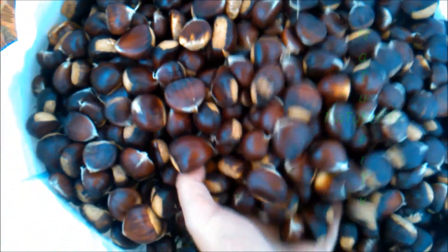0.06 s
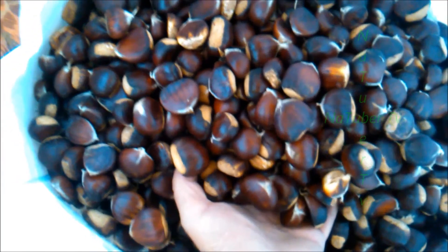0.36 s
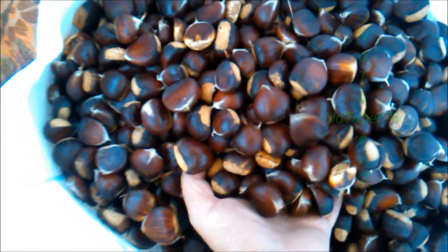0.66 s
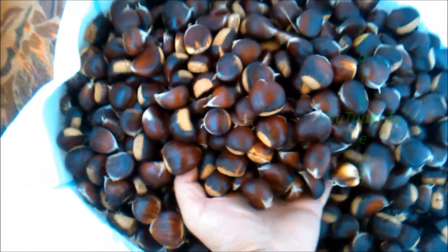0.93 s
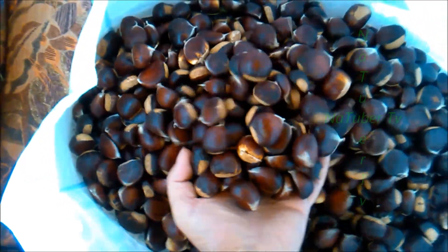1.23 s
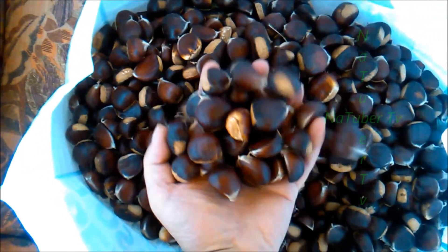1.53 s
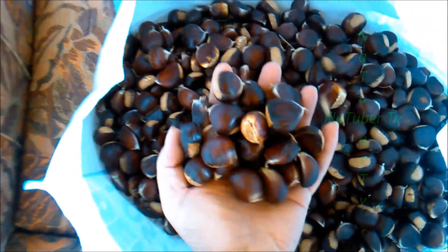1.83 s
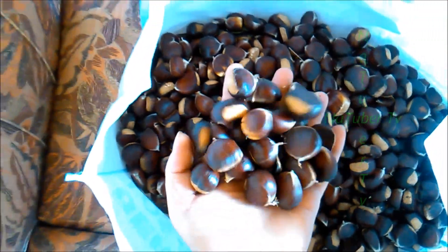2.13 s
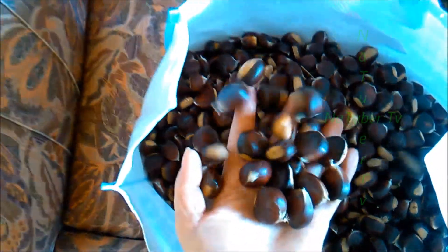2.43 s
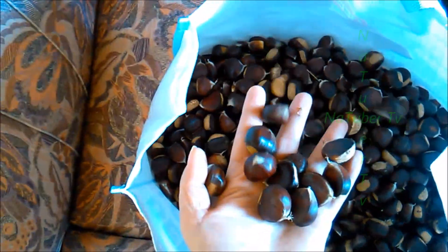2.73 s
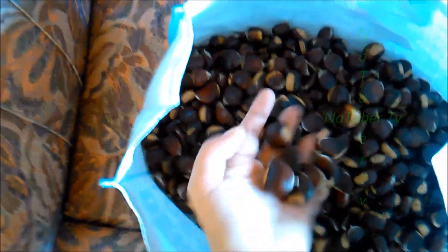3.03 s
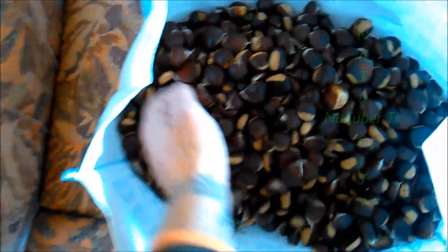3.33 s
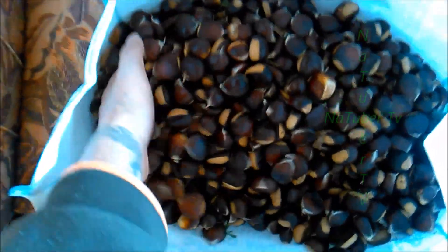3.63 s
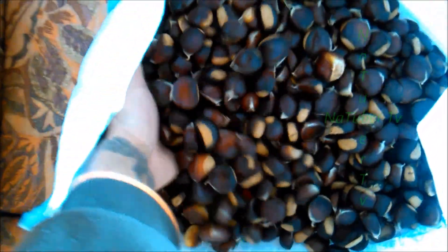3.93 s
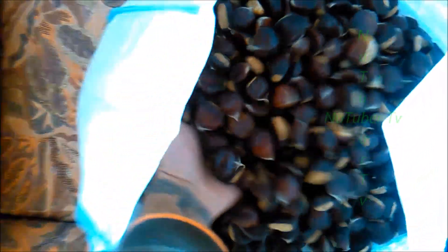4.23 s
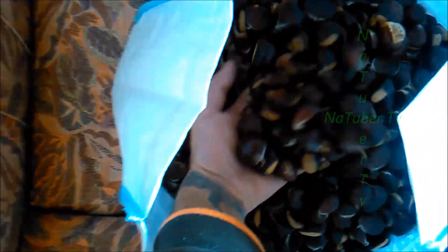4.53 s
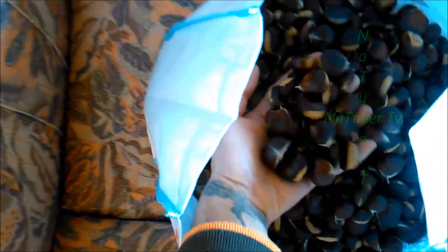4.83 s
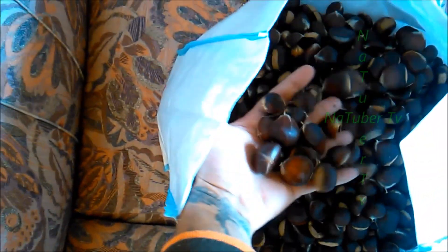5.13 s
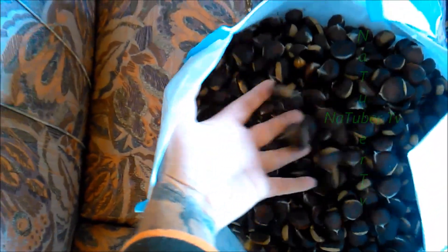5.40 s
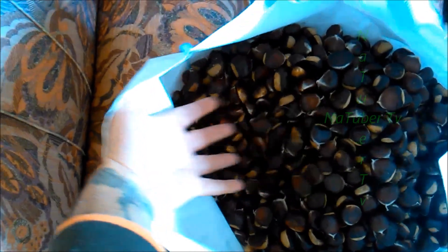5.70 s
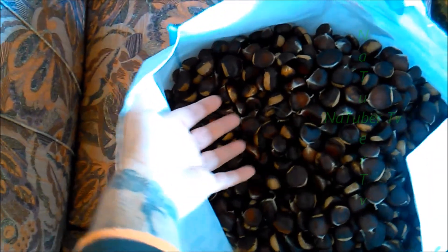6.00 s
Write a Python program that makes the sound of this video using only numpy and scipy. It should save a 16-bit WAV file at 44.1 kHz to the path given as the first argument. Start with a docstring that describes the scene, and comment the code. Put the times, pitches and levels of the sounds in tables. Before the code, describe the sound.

Chestnuts click and scrape in a plastic sack as a hand digs in, with a few crisp snaps of plastic in the first half second. The shells shift and tumble, swelling around 1.5 seconds. From about 1.8 seconds a handful trickles back, each nut giving a hard click and a soft thud, thickest between 2.5 and 3.4 seconds. A very faint, thin whistle comes and goes around 2 seconds. From 3.6 seconds the hand digs along the side, so the nuts scrape and the sack rustles and crackles, popping sharply near 4.3 seconds. A second, sparser handful clacks down between 4.9 and 5.7 seconds amid more crinkling. The loudest snap of plastic comes at about 5.9 seconds, then the movement fades with one light click. Everything is close, in a small furnished room with little echo.

```python
"""Chestnuts in a plastic sack on a sofa: a hand digs in, lifts a handful and lets it trickle back, twice.
Each falling nut clicks with its shell and thuds into the pile; shifting nuts scrape and tumble.
The sack rustles and snaps as the arm pushes along its wall. A faint whistle comes and goes.
Small furnished room, one close microphone."""
import sys
import numpy as np
from scipy import signal
from scipy.fft import rfft, irfft
from scipy.io import wavfile
from scipy.ndimage import uniform_filter1d

SR = 44100
rng = np.random.default_rng(int(sys.argv[2]) if len(sys.argv) > 2 else 0)


def wrap_up_sound(samples):
    """Save the sound to the file named by the first command line argument, as 16-bit audio."""
    columns = np.atleast_2d(samples).T
    # keep every value between -1 and 1, then stretch to whole-number steps
    tamed = np.clip(columns, -1, 1)
    steps = np.round(tamed * 32767).astype(np.int16)
    wavfile.write(sys.argv[1], SR, steps)


N = 276066

# nut on nut (time [s], upper shell mode [dB], lower shell mode [dB], knock [dB], thud before gain [dB])
NUT_IMPACTS = [(0.0803, -36, -41, -56, -63), (0.1197, -26, -30.5, -35.5, -60),
               (0.1938, -32.5, -39, -54, -42), (0.206, -37, -36, -37.5, -37.5),
               (0.2478, -32, -31, -38.5, -51), (0.381, -43.5, -49, -67, -44.5), (0.423, -58, -65, -45, -45),
               (0.5191, -50.5, -52, -48.5, -43.5), (0.635, -50, -45.5, -49, -60),
               (0.7482, -39.5, -43.5, -52, -75), (1.3246, -37.5, -43, -49, -42),
               (1.715, -64, -71, -67, -39), (1.776, -42.5, -47, -43, -42.5),
               (1.849, -45, -47.0, -51.5, -43.5), (1.8557, -37.5, -46, -54, -42),
               (1.8639, -38, -51, -51, -42), (1.883, -49, -50, -44.5, -42), (1.89, -37, -48, -51, -46),
               (2.094, -46, -45.5, -52.5, -46), (2.1123, -46, -52, -44.5, -42.5),
               (2.214, -52, -52, -46, -41.5), (2.223, -51, -45.5, -58, -40.5), (2.343, -65, -68, -72, -48),
               (2.3912, -48, -56, -65, -41.5), (2.4482, -42, -46, -46, -37), (2.4555, -32, -38.0, -38, -46),
               (2.538, -38, -45, -50, -44.5), (2.553, -38.5, -41.5, -44.5, -39.5),
               (2.613, -46, -49, -47, -44), (2.645, -64, -61, -47, -42), (2.6548, -40.5, -45.5, -57, -36.5),
               (2.6842, -42, -43.5, -42.5, -44), (2.7172, -26.5, -46, -43, -42),
               (2.728, -31, -36.5, -49, -34), (2.748, -41, -43, -55, -41), (2.757, -36, -36, -42, -42.5),
               (2.77, -25, -43, -52, -36), (2.781, -42, -39, -54, -36.5), (2.8142, -40, -45, -48, -43),
               (2.8582, -41, -47.0, -49, -50), (2.873, -35.5, -49, -51, -37.5),
               (2.881, -32, -43.5, -46, -57), (2.9098, -40, -45, -52, -43), (2.9161, -34, -46, -57, -49),
               (2.923, -43, -58, -53, -53), (2.9392, -45, -52, -46, -39.5), (2.997, -44, -52, -55, -43.5),
               (3.013, -44, -48, -50, -44), (3.0688, -45.5, -59, -60, -45.5),
               (3.0945, -30, -38, -47, -40.5), (3.186, -42, -46.5, -57, -64),
               (3.214, -26.5, -38, -44.5, -38), (3.256, -37, -40.5, -44, -36), (3.285, -29, -44, -50, -40),
               (3.294, -36, -41, -47, -46), (3.311, -33, -47, -60.0, -49), (3.322, -35, -48, -51, -48),
               (3.3344, -21.5, -27, -41, -41.5), (3.367, -31.5, -50, -44.5, -61),
               (3.3749, -30.5, -34, -49, -47), (3.3894, -38, -45, -42.5, -39.5),
               (3.879, -38.5, -36.5, -51, -54), (4.91, -36, -45, -48, -40), (5.138, -36.5, -50, -61.5, -65),
               (5.1774, -34, -43.5, -54, -44.5), (5.2438, -37.5, -45.0, -49, -58),
               (5.2876, -27.5, -40.5, -43.5, -51), (5.356, -36, -50, -50, -42),
               (5.362, -35.5, -48, -44.5, -49), (5.4952, -32, -42, -36, -38.5),
               (5.546, -30.5, -44, -45, -34), (5.578, -30.5, -44, -52, -48), (5.652, -28.5, -36, -51, -60),
               (5.7443, -54, -52, -35, -31), (6.21, -44.5, -55, -67, -62)]
# sack wall snapping over (time [s], panel level [dB], panel pitch [Hz], crease crack [dB])
SACK_SNAPS = [(0.0082, -39, 1160, -41), (0.0426, -32.5, 3170, -32), (0.1598, -38, 1250, -48),
              (0.1605, -34.5, 3240, -33), (0.3233, -53, 1300, -42.5), (0.3439, -42.5, 840, -42),
              (0.4515, -50, 3560, -47), (3.701, -41, 3280, -49), (3.866, -35, 5000, -35),
              (3.98, -47, 3800, -37), (4.2695, -34.5, 1220, -32.5), (4.3225, -34.5, 1560, -57),
              (4.3334, -41, 1630, -31), (4.338, -27, 1280, -31.5), (4.452, -38.5, 1930, -39),
              (4.487, -45, 1900, -36), (4.7442, -39.5, 730, -39.5), (4.965, -39, 1390, -35),
              (4.9754, -38.5, 2140, -36), (5.2366, -47, 1670, -39), (5.386, -41, 950, -55),
              (5.4225, -39.5, 1730, -36.5), (5.462, -47, 1800, -36), (5.559, -41, 1160, -32.5),
              (5.617, -36.5, 940, -38), (5.721, -36, 1350, -39), (5.7365, -36, 630, -61),
              (5.7456, -25, 1520, -32.5), (5.796, -43, 1260, -39.5), (5.807, -38.5, 1100, -43),
              (5.8644, -20, 1660, -24)]
# faint tones (time [s], length [s], pitch [Hz], level [dB])
WHISTLE_TONES = [(1.752, 0.082, 1920, -65), (1.948, 0.16, 1930, -67.5), (2.323, 0.14, 2090, -66)]

# hand working in the nuts (time [s], effort [dB])
HAND_EFFORT = [(0, -4), (0.24, -2.5), (0.4, -14.5), (0.59, -21.5), (0.68, -9.5), (0.79, -23.5),
               (0.92, -12.5), (1.33, -5), (1.42, -9), (1.58, -1.5), (1.76, -13.5), (2.25, -21.5),
               (2.78, -9), (3.05, -18.5), (3.33, -5.5), (3.55, -15.5), (3.63, -6.5), (3.85, -1.5),
               (4.27, -2), (4.63, -8.5), (4.76, -4.5), (5.15, -10), (5.4, -8), (5.58, -1.5), (5.82, -6),
               (5.97, -15.5), (6.06, -25), (6.26, -20.5)]
# arm pressing on the sack wall (time [s], contact [dB])
WALL_CONTACT = [(0, 4.5), (0.35, 3.5), (0.8, 1.5), (3.4, -8), (3.7, 4.5), (4.25, 5.5), (5.1, -7),
                (5.95, 5.5)]
# how much of the pile moves with the hand (time [s], gain [dB])
MOVING_BULK = [(0, -5.5), (0.3, -6.5), (0.9, 1.5), (1.3, -2), (1.55, 2.5), (2.7, -2.5), (3.35, 0.5),
               (3.75, 1), (4.1, -1), (4.8, 0.5), (5.3, -0.5), (5.78, 1), (6.2, 3)]

# spectra (frequency [Hz], relative level [dB])
UPPER_SHELL_EQ = [(1000, -72), (2600, -36), (5100, -18), (6200, -1.5), (8000, 4.5), (9400, -2),
                  (13000, -10), (16000, -13)]
LOWER_SHELL_EQ = [(1500, -42), (2600, -7), (3500, 4), (5100, 5), (6400, -1.5), (9000, -18)]
KNOCK_EQ = [(350, -6), (620, 2.5), (950, 3.5), (1250, 3.5), (1900, 4), (2500, 1.5), (5000, -46)]
PILE_EQ = [(40, -36), (85, -8.5), (110, -6), (135, 0), (165, -5.5), (215, -2), (280, 0.5), (420, -11),
           (590, -10), (850, -18.5), (1300, -20), (2000, -26), (4000, -38.5)]
SCRAPE_EQ = [(400, -42.5), (1800, -2), (2500, -17.5), (3400, 0), (5100, 1), (6100, 2.5), (7800, 6.5),
             (9400, -6.5), (12000, -11), (16000, -17)]
SACK_EQ = [(200, -2.5), (600, 9), (900, 3.5), (1300, 4), (1950, 0), (2500, -4.5), (3300, 2), (5000, 0),
           (8000, -10.5), (16000, -32)]
CREASE_EQ = [(500, 3.5), (1600, 10), (2400, 7), (2950, 6.5), (4400, 5.5), (5400, 8.5), (6900, 1.5),
             (8300, 8.5), (10000, -17), (16000, -25)]
ROOM_TONE_EQ = [(25, -24), (100, -3), (290, -24), (450, -11), (600, -33), (1900, -23), (2600, -29),
                (7700, -33.5), (16000, -36)]


def falling_nuts(upper_hz=7860, lower_hz=5030, knock_hz=1200, typical_db=-34, thud_gain_db=5):
    """A nut grazes, strikes, bounces: each time its shell rings over a hollow knock. The pile thuds."""
    out = np.zeros(N)
    graze_db, bounce_db, sink_s = -24, -9, 0.00151
    size_spread_oct, shape_spread_oct = 0.058, 0.1
    for time_s, upper_db, lower_db, knock_db, thud_db in NUT_IMPACTS:
        body_hz = knock_hz * 2 ** rng.uniform(-0.86, 1.0)  # big nuts knock lower
        touch_s = 0.0027 * 2 ** (-0.04 * (upper_db - typical_db))  # hard blows are brief, soft ones scuff
        early_s, late_s = rng.uniform(0.0017, 0.008, 2)
        for lag_s, touch_db in ((-early_s, graze_db), (0, 0), (late_s, bounce_db)):
            push = contact(crack_s=touch_s, scatter_db=-20, decay_s=4 * touch_s, rise_s=0.00025)
            size_ratio = 2 ** (size_spread_oct * rng.standard_normal())
            shape_ratio = 2 ** (shape_spread_oct * rng.standard_normal())
            upper = colour(push + undb(7) * ring(push, size_ratio * upper_hz, q=12), UPPER_SHELL_EQ)
            lower = colour(push + undb(8) * ring(push, shape_ratio * lower_hz, q=7), LOWER_SHELL_EQ)
            shove = contact(crack_s=0.0018, scatter_db=-14, decay_s=0.006)
            knock = colour(shove + undb(9) * ring(shove, body_hz, q=4.4), KNOCK_EQ)
            clack = at_level(upper, upper_db) + at_level(lower, lower_db) + at_level(knock, knock_db)
            add(out, time_s + lag_s, undb(touch_db) * clack)
        thud = colour(contact(crack_s=0.0067, scatter_db=-6.5, decay_s=0.015), PILE_EQ)
        add(out, time_s + sink_s, at_level(thud, thud_db + thud_gain_db))
    return out


def shifting_nuts(scrape_db=-41, rustle_db=-43, tumble_db=-36, rms_rate_hz=280):
    """Stirred shells tick and slide, rustle the plastic and tumble deeper in the pile."""
    effort_db, wall_db = curve(HAND_EFFORT), curve(WALL_CONTACT)
    rate_hz = rms_rate_hz * unit(undb(1.1 * effort_db))  # harder digging, more contacts
    ticks = sum(ring(grains(rate_hz, spread_db=9.5, decay_s=0.0016), hz, q=4.1)
                for hz in np.geomspace(600, 11000, 8))
    slips = grains(2 * rate_hz, spread_db=7, decay_s=0.0012)
    contacts = unit(unit(ticks) + slips)
    # nuts gliding along the plastic: even hiss replaces the ticks
    glide = undb(wall_db - 4)
    friction = (contacts + glide * rng.standard_normal(N)) / np.hypot(1, glide)
    scrape = colour(friction, SCRAPE_EQ) * undb(scrape_db + effort_db)
    rustle = colour(friction, SACK_EQ) * undb(rustle_db + effort_db + wall_db)
    pile_db = tumble_db + 0.89 * effort_db + 0.18 * wall_db + curve(MOVING_BULK)
    tumble = colour(grains(rate_hz=260, spread_db=2.5, decay_s=0.0032), PILE_EQ) * undb(pile_db)
    return scrape + rustle + tumble


def sack_snaps(typical_db=-36, flip_s=0.00039, knock_hz=680, knock_rel_db=-13, jolt_db=-39.5):
    """A crease buckles and cracks, the panel beside it rings, the nuts behind it knock and thud."""
    out = np.zeros(N)
    for time_s, panel_db, panel_hz, crack_db in SACK_SNAPS:
        excess_db = panel_db - typical_db
        push = contact(crack_s=0.0016, scatter_db=-4, decay_s=0.0049, rise_s=0.00089)
        # panel flips all at once: one impulse, a woody pop
        push[int(flip_s * SR)] += undb(-0.05 * excess_db) * np.linalg.norm(push)
        panel = at_level(ring(ring(push, panel_hz, q=3.2), panel_hz, q=1.2), panel_db)
        crack = at_level(colour(push, CREASE_EQ), crack_db)
        shove = contact(crack_s=0.002, scatter_db=-10, decay_s=0.007)
        knock = at_level(ring(ring(shove, knock_hz, q=1.6), knock_hz, q=1), panel_db + knock_rel_db)
        jolt = at_level(colour(shove, PILE_EQ), jolt_db + 0.17 * excess_db)
        add(out, time_s, panel + crack + knock + jolt)
    return out


def whistles(waver=0.0044, waver_s=0.012):
    """Thin, slightly unsteady tones swell and fade."""
    out = np.zeros(N)
    for time_s, length_s, hz, level_db in WHISTLE_TONES:
        size = int(length_s * SR)
        drift = unit(uniform_filter1d(rng.standard_normal(SR), int(waver_s * SR)))[:size]
        tone = np.sin(2 * np.pi * np.cumsum(hz * (1 + waver * drift)) / SR)
        add(out, time_s, undb(level_db) * unit(tone * signal.windows.tukey(size)))
    return out


def room_reverb(x, t60_s=0.38, predelay_s=0.0071, cutoff_hz=7000):
    """Short, soft tail of a furnished room."""
    t = np.arange(SR // 2) / SR
    tail = rng.standard_normal(len(t)) * undb(-60 * t / t60_s) * (t > predelay_s)
    tail = signal.sosfilt(signal.butter(1, cutoff_hz, fs=SR, output="sos"), tail)
    return signal.fftconvolve(x, tail / np.linalg.norm(tail))[:N]


def room_tone(level_db=-58):
    """Faint steady room noise."""
    return undb(level_db) * colour(rng.standard_normal(N), ROOM_TONE_EQ)


def contact(crack_s, scatter_db, decay_s, rise_s=0.00037, size=4096):
    """Brief rough contact, then dying scatter from nearby surfaces."""
    t = np.arange(size) / SR
    attack = 1 - np.exp(-t / rise_s)
    decay = np.exp(-t / crack_s) + undb(scatter_db) * np.exp(-t / decay_s)
    return rng.standard_normal(size) * attack * decay


def grains(rate_hz, spread_db, decay_s):
    """Shower of tiny, uneven noise bursts; rms 1 at any rate."""
    starts = rng.random(N) < rate_hz / SR
    sizes = undb(spread_db * np.minimum(rng.exponential(size=N), np.pi))
    pole = np.exp(-1 / (decay_s * SR))
    power = signal.lfilter([1], [1, -pole], starts * sizes ** 2 / rate_hz)
    return unit(np.sqrt(power) * rng.standard_normal(N))


def ring(x, hz, q):
    """Damped resonance, unity gain at centre."""
    return signal.lfilter(*signal.iirpeak(hz, q, fs=SR), x)


def colour(x, spectrum, size=4096):
    """Minimum-phase, unit-energy filter through (frequency [Hz], level [dB]) points."""
    hz, db = np.transpose(spectrum)
    bins_hz = np.maximum(np.arange(size // 2 + 1) * SR / size, 1)
    gain = unit(undb(np.interp(np.log(bins_hz), np.log(hz), db)))
    cepstrum = irfft(np.log(gain))
    cepstrum[1:size // 2] *= 2
    cepstrum[size // 2 + 1:] = 0
    impulse_response = irfft(np.exp(rfft(cepstrum)))
    return signal.fftconvolve(x, impulse_response)[:len(x)]


def at_level(x, db, window_s=0.006):
    """Scale a burst so its energy, spread over window_s, has rms level db."""
    return x * undb(db) * np.sqrt(window_s * SR / np.sum(x ** 2))


def curve(points):
    """Linear envelope through (time [s], value) points."""
    return np.interp(np.arange(N) / SR, *np.transpose(points))


def add(track, time_s, sound):
    """Mix sound into track at time_s."""
    start = max(int(time_s * SR), 0)
    track[start:start + len(sound)] += sound[:N - start]


def undb(db):
    """Decibels to gain."""
    return 10 ** (np.asarray(db) / 20)


def unit(x):
    """Scale to rms 1."""
    return x / np.sqrt(np.mean(x ** 2))


def scene(nut_send_db=-16.5, sack_send_db=-19):
    """Nuts and sack in the room, mono; the sack's rim is nearest, so driest."""
    nuts = falling_nuts() + shifting_nuts()
    sack = sack_snaps()
    reverb = room_reverb(undb(nut_send_db) * nuts + undb(sack_send_db) * sack)
    return (nuts + sack + reverb + room_tone() + whistles())[None]


def record(dry, dip_hz=2530, cutoff_hz=15900):
    """Microphone dip in the upper mids, then the recorder's steep low-pass."""
    mic = dry - 0.5 * ring(dry, dip_hz, q=6)
    return signal.sosfilt(signal.ellip(10, 0.2, 70, cutoff_hz, fs=SR, output="sos"), mic)


dry = scene()
out = record(dry)
wrap_up_sound(out)
```